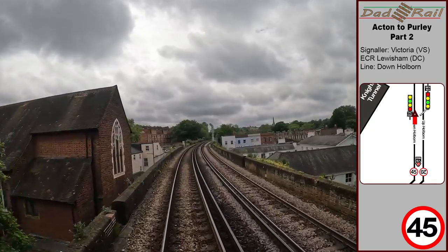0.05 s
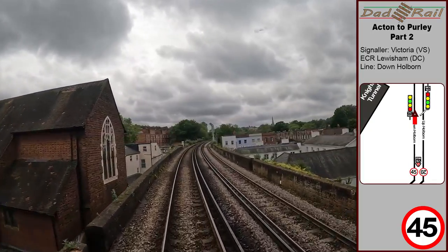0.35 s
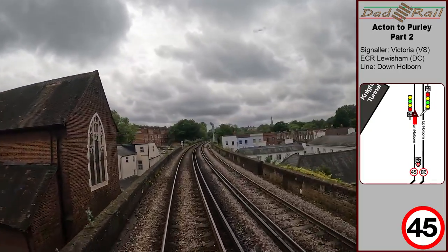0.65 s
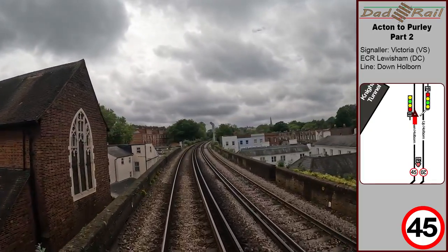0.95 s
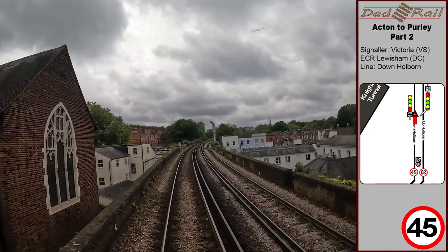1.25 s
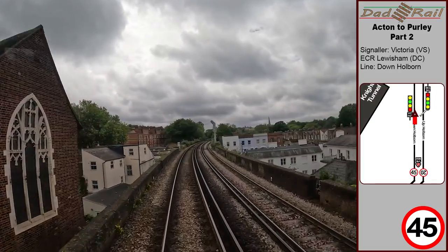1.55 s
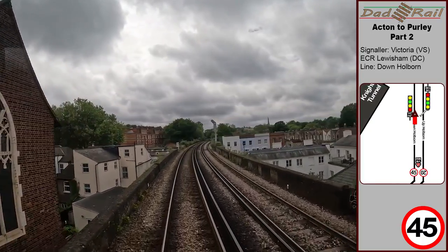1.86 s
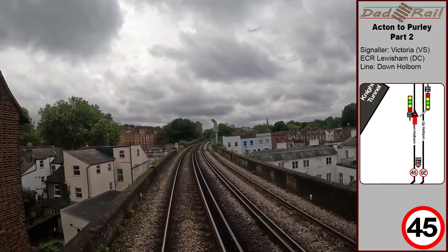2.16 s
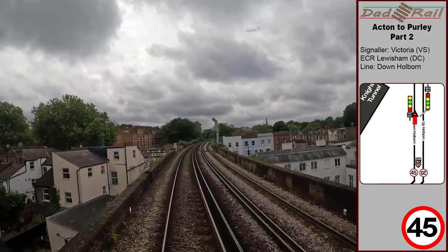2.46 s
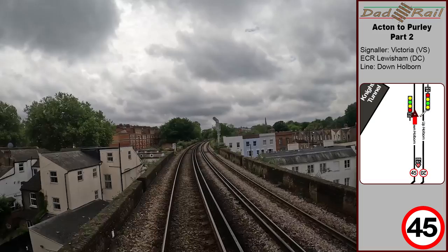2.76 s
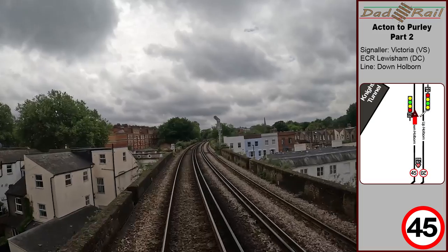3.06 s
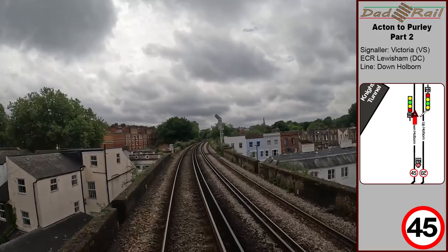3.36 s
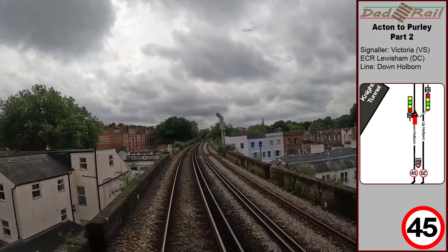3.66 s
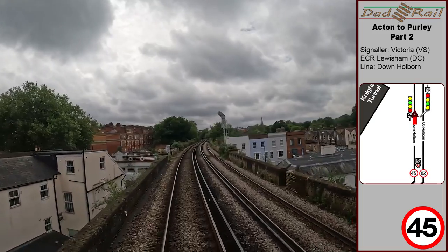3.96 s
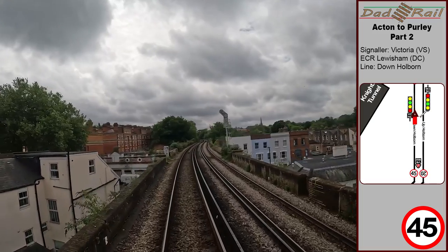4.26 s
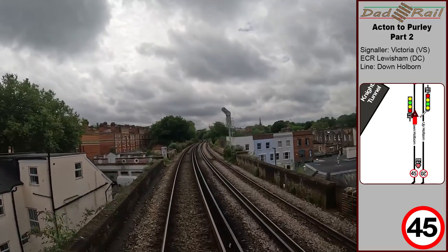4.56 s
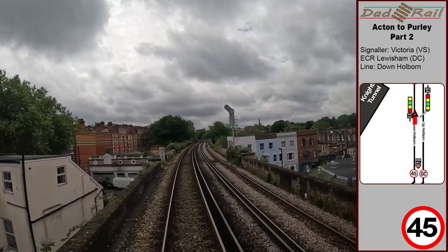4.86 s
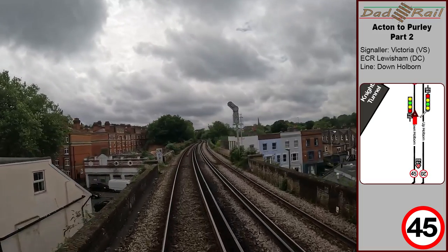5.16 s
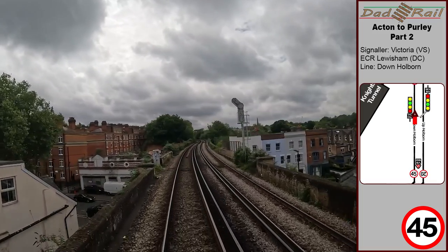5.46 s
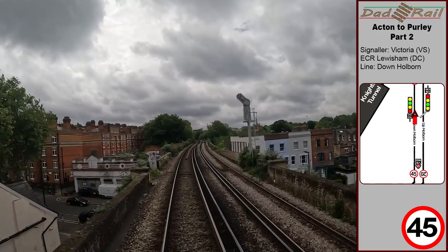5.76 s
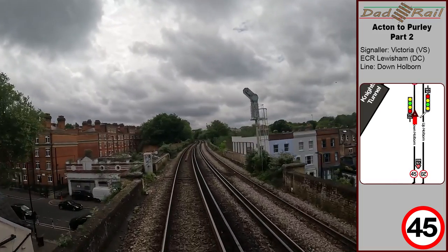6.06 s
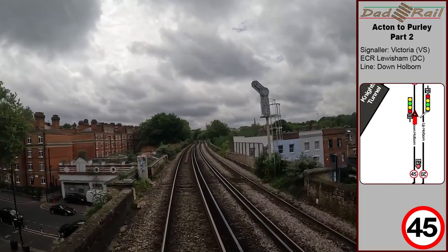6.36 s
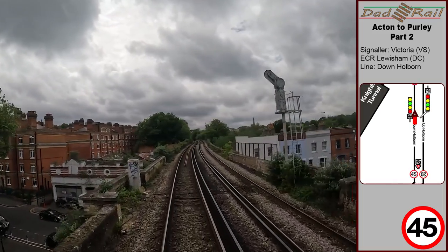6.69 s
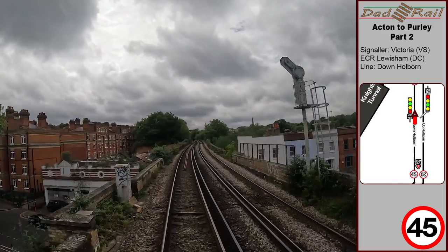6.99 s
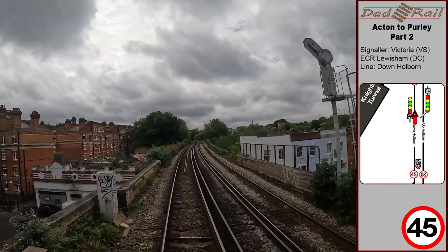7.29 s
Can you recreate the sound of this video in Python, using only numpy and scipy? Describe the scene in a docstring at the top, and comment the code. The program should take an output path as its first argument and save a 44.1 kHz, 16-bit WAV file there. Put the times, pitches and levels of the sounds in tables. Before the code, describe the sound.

Heard from inside a locomotive cab, a large diesel engine runs at constant speed with a deep throbbing drone, growling gears, fast clatter and humming fans. Wheels rumble underneath. After about two seconds they roar briefly over rough track and begin a high, fluttering metallic singing on a curve, with fits of hiss and thin squeals. The singing lasts to the end, over the unchanging engine and a faint hiss of air.

```python
"""Inside the cab of a freight locomotive, a twelve-cylinder two-stroke diesel runs at full, governed speed.
Its exhaust throbs once a turn and booms in the cab; gears growl, injectors and valves clatter,
and fans and pumps hum and whine. Wheels rumble underneath and roar over a rough stretch of rail.
On a curve their flanges sing, hiss and squeal against the rail. Air hisses faintly throughout."""
import sys
import numpy as np
from scipy import signal
from scipy.fft import rfft, irfft
from scipy.io import wavfile
from scipy.ndimage import uniform_filter1d, minimum_filter1d

SR = 44100
rng = np.random.default_rng(int(sys.argv[2]) if len(sys.argv) > 2 else 0)


def wav_out(sig):
    """Save sig, one row per channel (or a flat mono array), as 16-bit PCM at SR to the path in sys.argv[1]."""
    wavfile.write(sys.argv[1], SR, np.round(np.clip(np.atleast_2d(sig).T, -1, 1) * 32767).astype(np.int16))


N = 332073

SHAFT_HZ = 15.19
# Moments when the flange presses on the rail. Each row: start in seconds, start of the release
# in seconds, hiss level in dB, boost to the wheel's song in dB.
FLANGE_GRAZES = [(2.2, 2.8, -55, 1), (2.8, 3.903, -50.5, 2.5), (5.5, 5.9, -76, 4), (6.096, 6.72, -63.5, 5),
                 (6.85, 7.148, -70.5, 3.5)]
GRAZE_ATTACK_S, GRAZE_RELEASE_S = 0.14, 0.17


def undb(db):
    """Decibels to gain."""
    return 10 ** (np.asarray(db) / 20)


def unit(x):
    """Scale to rms 1."""
    return x / np.std(x)


def curve(rows):
    """Join (seconds, value) rows by straight lines."""
    return np.interp(np.arange(N) / SR, *np.transpose(rows))


def swell(start, end, attack, release):
    """Rise from 0 to 1 after start, hold until end, then fall back; times in seconds."""
    hold_end = max(end, start + attack)
    return curve([(start, 0), (start + attack, 1), (hold_end, 1), (hold_end + release, 0)])


def walk(rate, count=512, size=4096):
    """A smooth random drift that changes about rate times a second, with a spread near 1."""
    smooth = signal.resample(rng.standard_normal(count), size)
    return np.interp(np.arange(N) / SR * rate, np.arange(size) * count / size, smooth)


def tone(cycles):
    """A sine of rms 1 that starts anywhere in its cycle."""
    return np.sqrt(2) * np.sin(2 * np.pi * (cycles + rng.random()))


def colour(x, points):
    """Give a flat sound of rms 1 a spectrum of (Hz, dB per Hz) points."""
    hz, db = np.transpose(sorted(points))
    f = np.maximum(np.fft.rfftfreq(N, 1 / SR), 1)
    gain = undb(np.interp(np.log(f), np.log(hz), db))
    return irfft(rfft(x) * gain * np.sqrt(SR / 2), N)


def resonate(x, modes):
    """Ring steep-sided resonances (Hz, width in Hz, dB) side by side."""
    f = np.maximum(np.fft.rfftfreq(N, 1 / SR), 1)
    response = sum(undb(db) / (1 + 1j * (f / hz - hz / f) * hz / width) ** 2 for hz, width, db in modes)
    return irfft(rfft(x) * response, N)


def crankshaft(start_turns=.5, wander_turns=0.0013):
    """Turns made so far; the governor holds the speed almost perfectly."""
    return start_turns + np.arange(N) / SR * SHAFT_HZ + wander_turns * walk(6)


def exhaust_drone(turns, spread_turns=.125, waver_db=0.53):
    """The exhaust throbs once a turn; the cab delays each higher order more, which rounds the throb."""
    # The engine's harmonics. Each row: multiple of the crankshaft rate, level in dB.
    engine_orders = [(1, -31.5), (4, -19), (5, -20.5), (6, -27.5), (7, -25.5), (8, -51), (10, -42),
                     (11, -42.5), (13, -40), (15, -44.5), (16, -39), (17, -41.5), (28, -43.5), (30, -32.5),
                     (69, -52.5), (77, -46.5), (90, -48)]
    drone = 0
    for order, db in engine_orders:
        delayed_turns = turns - spread_turns * order
        harmonic = np.sqrt(2) * np.sin(2 * np.pi * order * delayed_turns)
        drone += undb(db + waver_db * walk(3.7)) * harmonic
    return drone


def gear_growl(turns, waver_db=0.5, load_db=0.2):
    """The gear train growls in a cluster of close orders, rising and falling a little with the load."""
    # The tones of the gears. Each row: multiple of the crankshaft rate, level in dB.
    gear_orders = [(36, -44.5), (37, -47.5), (40, -47.5), (41, -43.5), (42, -42.5), (43, -45), (44, -47.5),
                   (45, -40), (46, -45), (49, -43.5), (50, -52)]
    growl = sum(undb(db + waver_db * walk(5)) * tone(order * turns) for order, db in gear_orders)
    return growl * undb(load_db * walk(2.26))


def fan_throb(turns, gain_db=1.0, fan_hz=358.3, fan_db=-3.0, order=24):
    """A fan hums just under twice the firing rate and beats with the engine six times a second."""
    # The loudness contour of the throb. Each row: time in seconds, relative level in dB.
    contour = [(0.0, -32), (0.27, -31.5), (1.53, -31), (4.36, -36), (6.96, -33), (7.53, -35.5)]
    engine = tone(order * turns)
    fan = undb(fan_db) * tone(fan_hz * np.arange(N) / SR)
    return unit(engine + fan) * undb(curve(contour) + gain_db)


def clatter(turns, rattle_db=-1.5, ring_db=-8.5, ring_top_hz=1400,
            knock_db=-6, knock_turns=0.036, uneven_db=2.5, cylinders=12):
    """Injectors and valves: each cylinder knocks once a turn with its own strength, and panels ring."""
    # Clatter through the bulkhead. Each row: frequency in Hz, relative level in dB per Hz.
    bulkhead_spectrum = [(150, -86), (500, -61.5), (620, -58.5), (715, -55), (850, -63), (1030, -60),
                         (1250, -63.5), (1500, -65.5), (1900, -69), (2350, -72), (2600, -71), (3780, -78),
                         (4180, -92.5), (8000, -120)]
    turn_samples = int(SR / SHAFT_HZ)
    grid = np.arange(turn_samples)
    place = turns % 1 * turn_samples
    knocks = 0
    for k, (strength, offset) in enumerate(rng.standard_normal((cylinders, 2))):
        firing_angle = k / cylinders + .015 * offset  # the two banks of the vee fire unevenly
        turns_since = (grid / turn_samples - firing_angle) % 1
        knocks += undb(uneven_db * strength) * np.exp(-turns_since / knock_turns)
    envelope = 1 + undb(knock_db) * knocks / knocks.mean()
    rattle = unit(np.interp(place, grid, envelope) * rng.standard_normal(N))
    # the lower panel modes ring on between knocks, the same on every turn
    lowpass = 1 / (1 + (np.fft.rfftfreq(turn_samples, 1 / SR) / ring_top_hz) ** 4)
    phases = np.exp(2j * np.pi * rng.random(len(lowpass)))
    one_turn = irfft(lowpass * phases, turn_samples) * np.sqrt(turn_samples)
    ring = np.interp(place, grid, one_turn)
    return colour(undb(rattle_db) * rattle + undb(ring_db) * ring, bulkhead_spectrum)


def auxiliaries(waver_db=2, slip_cycles=0.051):
    """Fans, pumps and alternator hum at their own speeds and beat against the engine orders."""
    # The tones of these machines. Each row: pitch in Hz, level in dB.
    machine_tones = [(29.9, -43), (716.5, -40), (889.7, -45.5), (895.8, -43.5), (1009.7, -49.5),
                     (1055.2, -47), (2127.9, -55), (2661.1, -54.5)]
    t = np.arange(N) / SR
    return sum(undb(db + waver_db * walk(4.3)) * tone(hz * t + slip_cycles * walk(3.02))
               for hz, db in machine_tones)


def deep_hum(hz=138.76, level_db=-30.0, slip_cycles=0.21, surge_db=2.5, surge_s=0.97, crest_s=4.43):
    """A deep hum, not tied to the crankshaft, surges about once a second and wavers in pitch."""
    t = np.arange(N) / SR
    surge = np.cos(2 * np.pi * (t - crest_s) / surge_s)
    return tone(hz * t + slip_cycles * walk(6)) * undb(level_db + surge_db * surge)


def running_gear(rumble_db=-1.5, sway_db=1.33, roll_db=-38.5, rough_db=8.5, patchy_db=1.34):
    """The body rumbles and sways; the wheels' roar wanders with the rail and swells on a rough stretch."""
    # The rumble of wheels and body. Each row: frequency in Hz, relative level in dB per Hz.
    rumble_spectrum = [(8, -60), (20, -58), (42, -48.5), (66, -38.5), (100, -41.5), (132, -40.5),
                       (160, -52), (195, -52), (230, -56), (270, -53), (330, -56.5), (450, -57.5),
                       (900, -83), (2000, -110)]
    # The wheels' roar through the floor. Each row: frequency in Hz, relative level in dB per Hz.
    roar_spectrum = [(120, -44), (220, -23), (400, -35.5), (700, -28.5), (1000, -27), (1400, -34),
                     (2000, -38.5), (3600, -45.5), (4300, -54), (6000, -60.5), (9000, -74), (15000, -77)]
    rumble = colour(rng.standard_normal(N), rumble_spectrum) * undb(rumble_db + sway_db * walk(4.86))
    rough_rail = swell(start=2.1, end=3.24, attack=0.63, release=0.63)
    roar = colour(rng.standard_normal(N), roar_spectrum)
    return rumble + roar * undb(roll_db + rough_db * rough_rail + patchy_db * walk(3.645))


def singing_wheel(hz, split_hz=36, side_db=-6, blur_cycles=0.15, stutter_db=3.0, flutter_db=1.0):
    """Stick-slip rings one wheel mode in a stutter; the wheel's rotation splits it into side tones."""
    t = np.arange(N) / SR
    cycles = np.cumsum(hz * np.ones(N)) / SR
    ring = 0
    for side in (-1, 0, 1):
        stutter = undb(side_db * abs(side) + stutter_db * walk(50))
        ring += stutter * tone(cycles + side * split_hz * t + blur_cycles * walk(50))
    return unit(ring * undb(flutter_db * walk(22)))


def wheel_song(lead_hz=2142, murmur_db=-48.5, sing_db=-39, bite_s=1.8, attack_s=0.33, sputter_db=0.85,
               second_hz=2080, second_db=-40.5, join_s=2.9, leave_s=6.15, sag_hz_per_s=8):
    """Two wheels of slightly different size sing against each other on the curve."""
    # the leading wheel murmurs until it bites into the curve, and sings louder while its flange presses
    bite = curve([(bite_s, 0), (bite_s + attack_s, 1)])
    pressed_db = sum(boost_db * swell(start, end, GRAZE_ATTACK_S, GRAZE_RELEASE_S)
                     for start, end, _, boost_db in FLANGE_GRAZES)
    lead = singing_wheel(lead_hz) * undb(murmur_db + (sing_db - murmur_db) * bite + pressed_db)
    sagging_hz = second_hz - sag_hz_per_s * (np.arange(N) / SR - join_s)
    joined = swell(join_s, leave_s, attack=0.16, release=0.25)
    second = singing_wheel(sagging_hz, split_hz=18) * undb(second_db) * joined
    return (lead + second) * undb(sputter_db * walk(8.6))


def flange_hiss(light_db=-61.0, fitful_db=1.5, flicker_db=1.0):
    """The flange always rubs lightly, grazes the rail harder in fits, and rings the wheel's high modes."""
    # The wheel's high resonances. Each row: centre in Hz, width in Hz, relative level in dB.
    wheel_modes = [(4360, 720, 0), (5200, 460, -1), (6170, 430, -2), (7770, 340, 1), (8600, 450, -3),
                   (10300, 3000, -10), (12240, 620, 2), (12740, 440, -4)]
    rub = rng.standard_normal(N) * undb(flicker_db * walk(40))
    power = undb(light_db - fitful_db * walk(2.6)) ** 2
    for start, end, hiss_db, _ in FLANGE_GRAZES:
        power += (undb(hiss_db) * swell(start, end, GRAZE_ATTACK_S, GRAZE_RELEASE_S)) ** 2
    return unit(resonate(rub, wheel_modes)) * np.sqrt(power)


def flange_squeals(width_hz=240, scrape_db=0.3):
    """Now and then a single high mode catches, swells with a scrape and lets go."""
    # Thin squeals. Each row: start in seconds, length in seconds, pitch in Hz, level at the crest in dB.
    catches = [(-.3, .85, 10180, -67), (2.8, 1.34, 7600, -55.5), (3.0, .97, 12170, -61),
               (3.6, .35, 6960, -55), (4.75, .66, 6820, -61), (6.2, 0.62, 5450, -62),
               (6.68, 0.18, 5400, -62)]
    t = np.arange(N) / SR
    squeals = 0
    for start, length, hz, db in catches:
        progress = np.clip((t - start) / length, 0, 1)
        arch = np.sqrt(np.abs(np.sin(np.pi * progress)))
        ring = unit(resonate(rng.standard_normal(N), [(hz, width_hz, 0)]))
        squeals += arch * undb(db) * ring
    return squeals * undb(scrape_db * walk(60))


def cab_air(gain_db=-3.0, swell_db=1.75, flicker_db=0.96):
    """Air hisses faintly through the cab, swelling and flickering."""
    # The colour of the hiss. Each row: frequency in Hz, relative level in dB per Hz.
    air_spectrum = [(2000, -105), (4400, -91), (5300, -88.5), (6450, -92), (6900, -84.5), (7300, -93.5),
                    (7720, -93), (9000, -100), (11400, -100), (12300, -93), (13100, -92), (14200, -104),
                    (15500, -105)]
    hiss = colour(rng.standard_normal(N), air_spectrum)
    return hiss * undb(gain_db + swell_db * walk(3.14) + flicker_db * walk(60))


def limiter(x, ceiling_db=-5.0, hold_s=0.024):
    """Turn the gain down smoothly around peaks that would pass the ceiling."""
    size = int(hold_s * SR)
    allowed = np.minimum(1, undb(ceiling_db) / (np.abs(x) + 1e-9))
    return x * uniform_filter1d(minimum_filter1d(allowed, size), size)


def scene():
    """Engine, wheels and air, all heard from one place in the cab."""
    turns = crankshaft()
    engine = exhaust_drone(turns) + gear_growl(turns) + fan_throb(turns) + clatter(turns)
    hums = auxiliaries() + deep_hum()
    wheels = running_gear() + wheel_song() + flange_hiss() + flange_squeals()
    return (engine + hums + wheels + cab_air())[None]


def record(dry):
    """A limiter holds down the strongest booms and a steep low-pass cuts the very top."""
    top_hz = 15700
    lowpass = signal.ellip(10, .2, 70, top_hz, fs=SR, output="sos")
    return signal.sosfilt(lowpass, limiter(dry))


dry = scene()
out = record(dry)
wav_out(out)
```